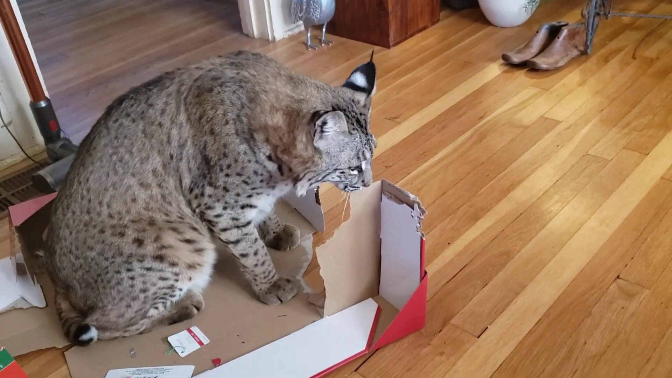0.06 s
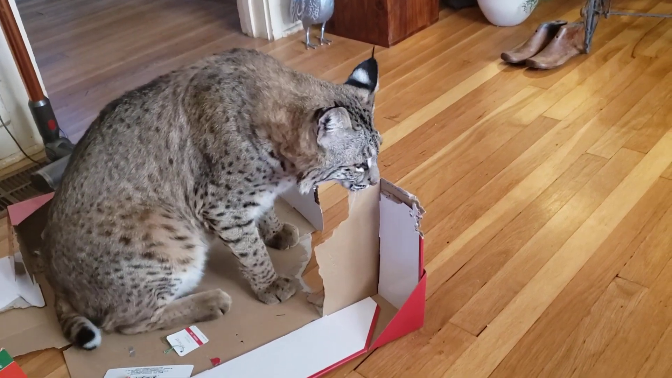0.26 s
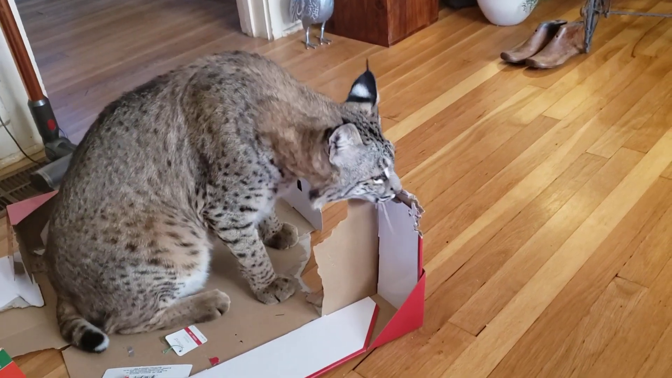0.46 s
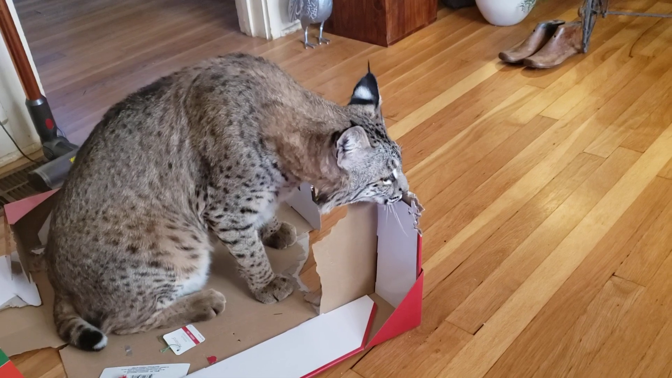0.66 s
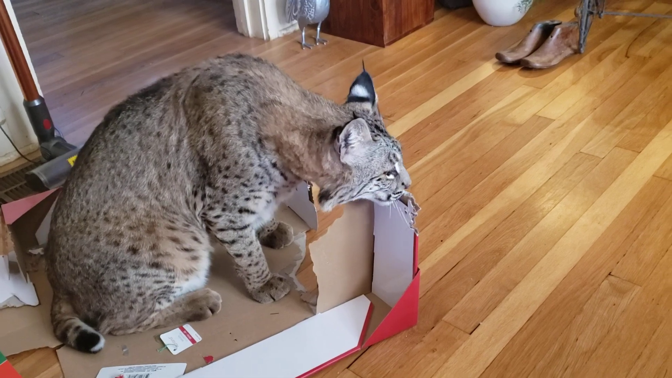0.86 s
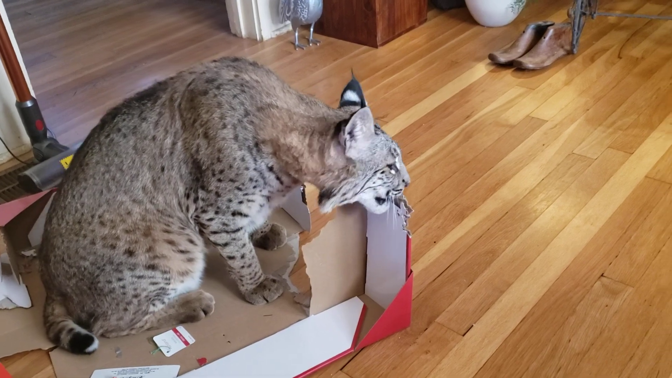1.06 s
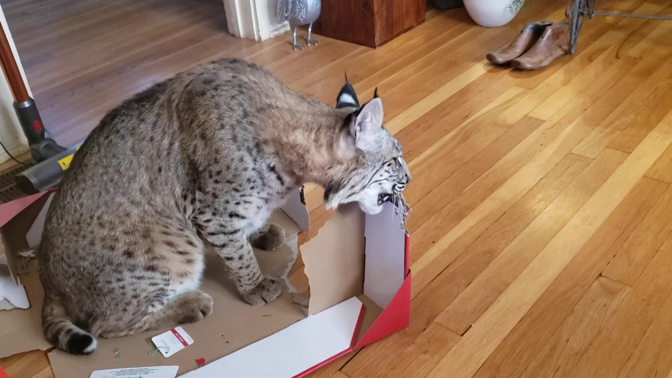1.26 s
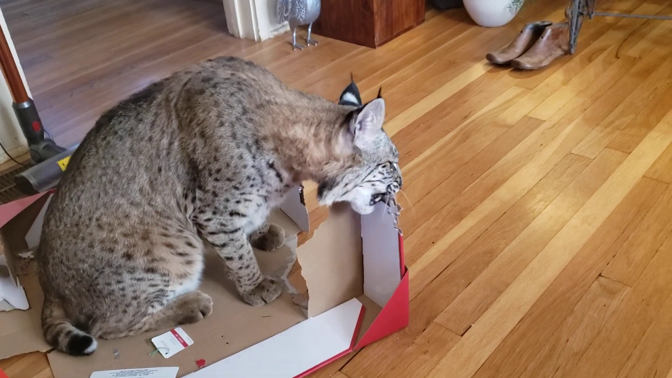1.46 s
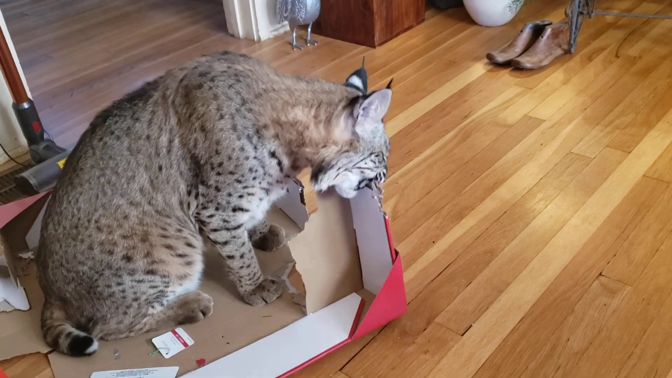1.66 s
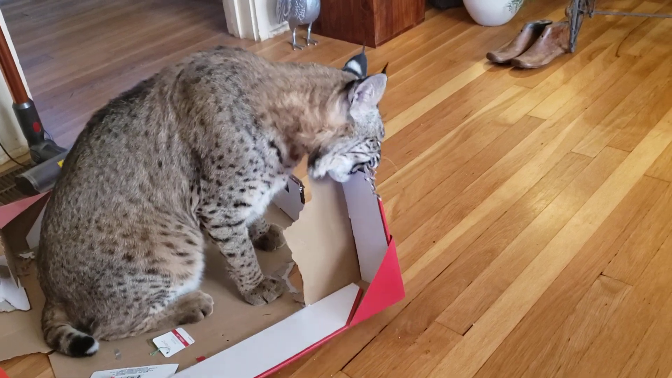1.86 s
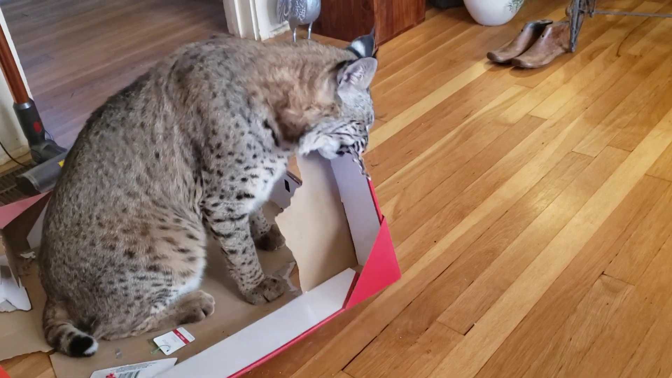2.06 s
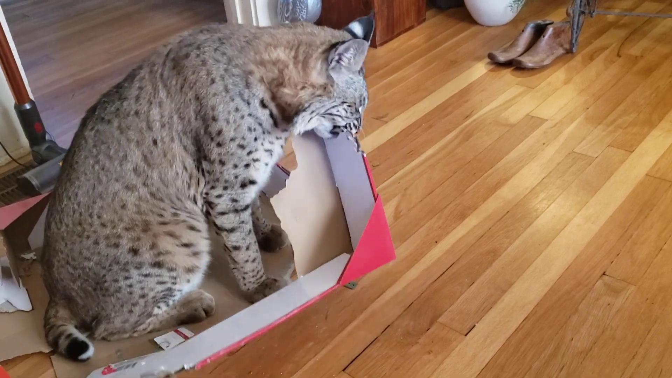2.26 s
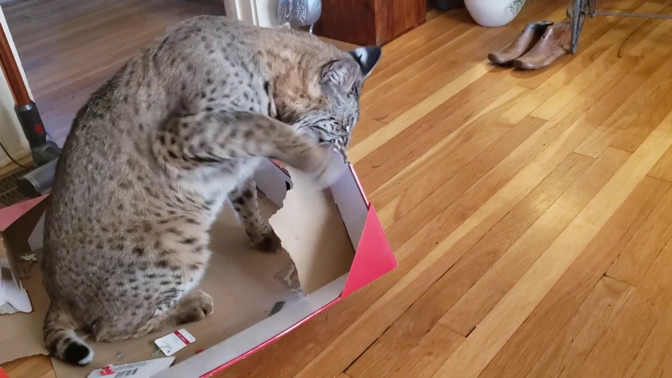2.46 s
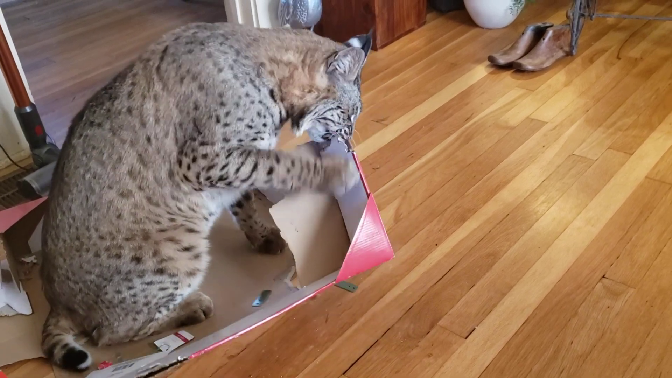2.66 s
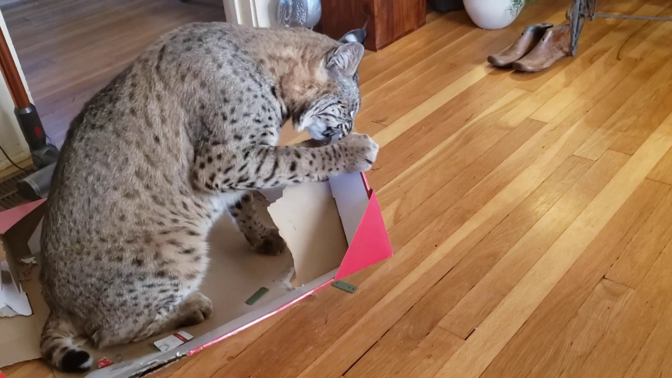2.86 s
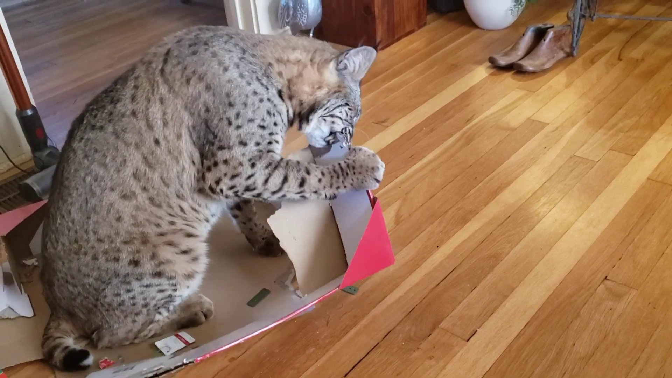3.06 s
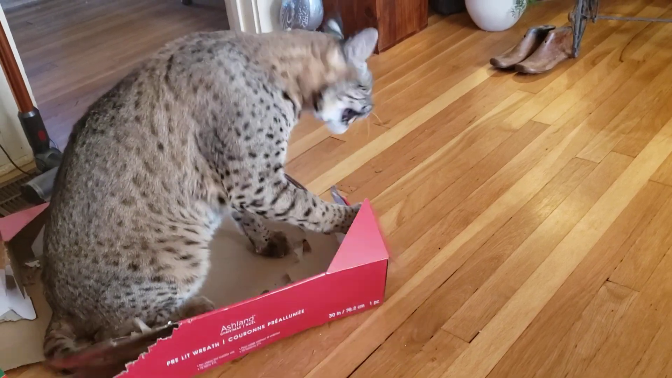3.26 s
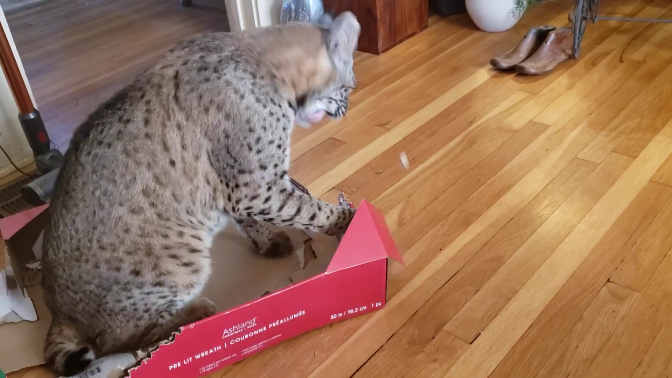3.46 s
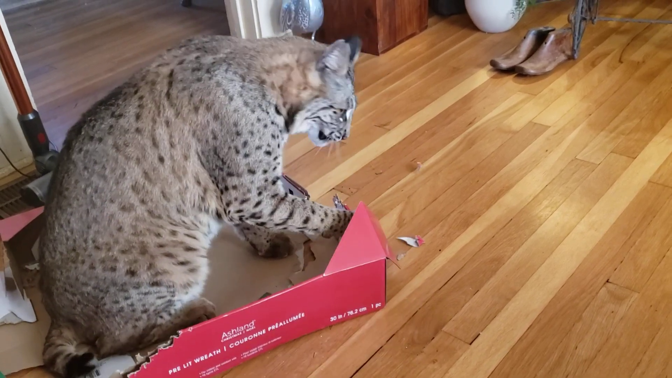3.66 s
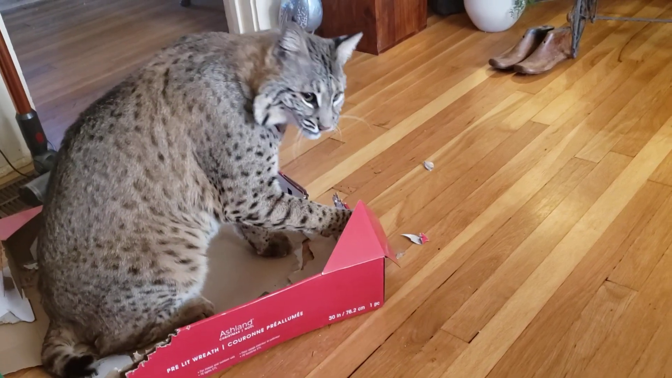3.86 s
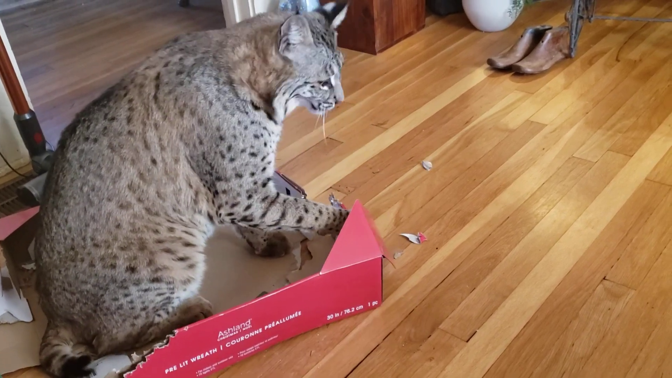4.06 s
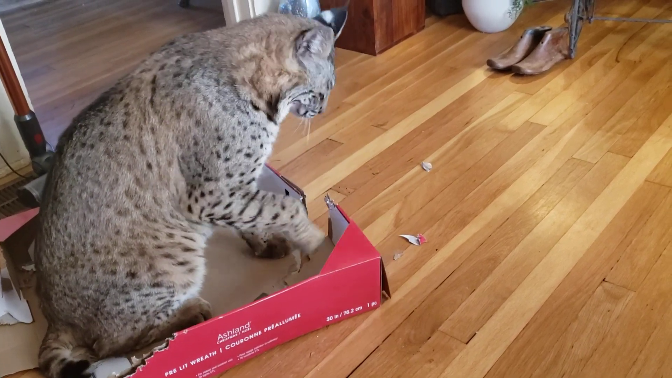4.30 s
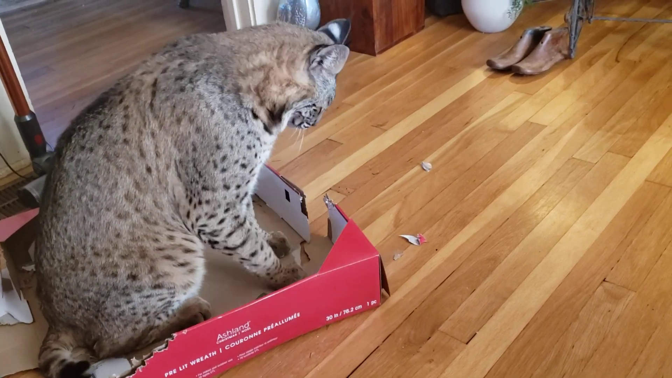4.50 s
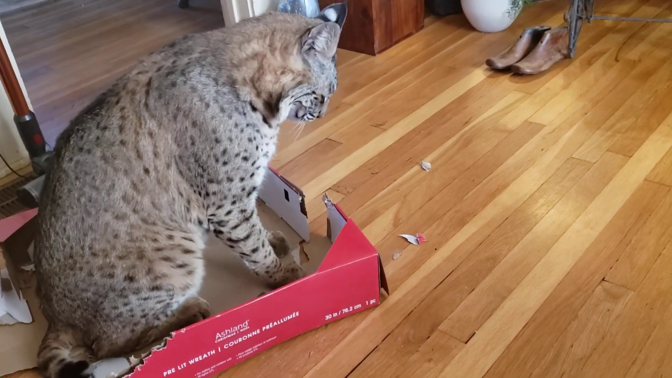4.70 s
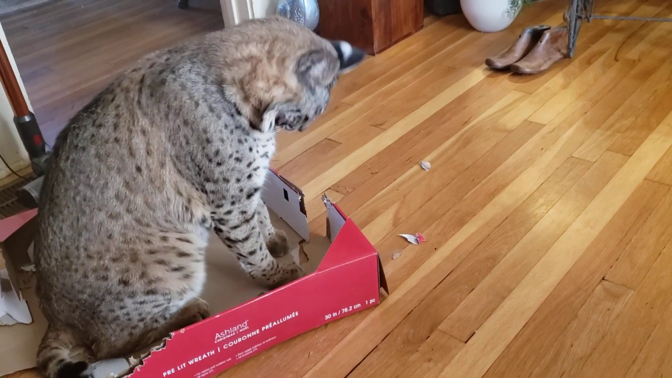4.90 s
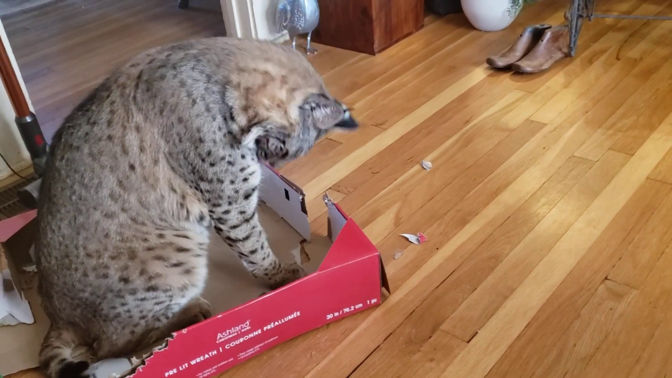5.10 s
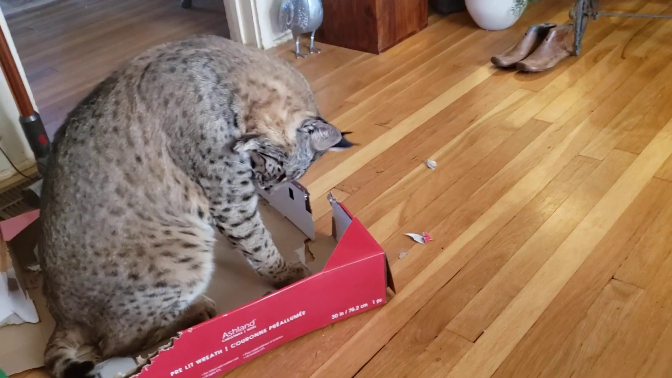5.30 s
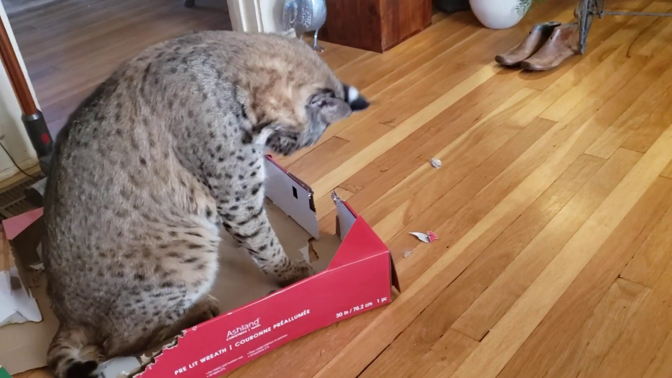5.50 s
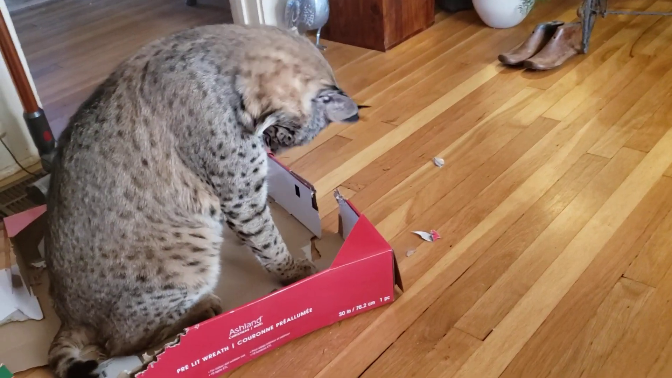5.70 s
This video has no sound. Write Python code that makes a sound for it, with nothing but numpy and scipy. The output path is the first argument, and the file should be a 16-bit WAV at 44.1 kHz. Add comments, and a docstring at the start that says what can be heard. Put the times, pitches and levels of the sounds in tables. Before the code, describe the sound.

Close stereo pickup of an animal chewing cardboard indoors. Light bite snaps and soft fur rustle grow into crunching and a creaking fold, peaking as a piece rips off and the flap slaps down with low wooden thuds. A short snort-like breath follows, then sparse muted knocks and paw scuffs with a short room reverberation.

```python
"""A low rumble and a thin hiss fill a quiet, lively room: steady noise of fixed colour and slowly varying level.
A big cat in a cardboard box on a wooden floor stirs and huffs: friction noise, and breath noise in resonances.
It bites the rim, and fibres snap as short noise bursts; a fold creaks by stick-slip, each slip ringing damped modes.
A piece tears off in dense crackle, the flap slaps back, and knocks excite the low notes of box and floorboards.
Strokes of fur and paws go on rubbing to the end, and decaying noise tails give the reverberation."""
import sys
import numpy as np
from scipy import signal
from scipy.fft import rfft, irfft, next_fast_len
from scipy.io import wavfile
from scipy.ndimage import uniform_filter1d, map_coordinates

SR = 44100
rng = np.random.default_rng(int(sys.argv[2]) if len(sys.argv) > 2 else 0)


def store_wav(level_fs):
    """Save 16-bit WAV to argv[1]."""
    pcm = np.round(np.clip(np.atleast_2d(level_fs), -1, 1) * 32767)
    wavfile.write(sys.argv[1], SR, pcm.T.astype(np.int16))


N = 253152

# Spectra of the room's rumble and hiss. Each row: frequency in Hz, density in dB per Hz.
RUMBLE_SPECTRUM = [(12, -53), (20, -22.5), (40, -4.5), (65, -2.5), (111, -6.5), (150, -16.5), (278, -36),
                   (304, -34), (323, -32), (400, -39), (520, -63), (880, -120)]
HISS_SPECTRUM = [(120, -35.5), (200, -6.5), (236, -2.5), (375, -18), (419, -12), (503, -24.5),
                 (1110, -24.5), (2130, -13), (3020, -21.5), (3840, -11), (5550, -15.5), (6930, -20),
                 (10600, -26.5), (15000, -16), (16500, -27)]
# Likeness of the two microphone signals. Each row: frequency in Hz, left-right coherence from 0 to 1.
COHERENCE = [(60, 0.94), (180, 0.72), (550, 0.34), (1650, 0.45), (4970, 0.15), (15000, 0.051)]
# Balance of the diffuse sound. Each row: frequency in Hz, left minus right in dB.
DIFFUSE_BALANCE = [(60, -2), (240, -2), (950, -0.5), (3770, -6), (15000, 1.5)]
# Reverberation of the room. Each row: frequency in Hz, 60 dB decay time in s.
ROOM_DECAY = [(100, 0.73), (500, 0.32), (1400, 0.31), (4000, 0.29), (10000, 0.23)]
# Panel modes of the box. Each row: frequency in Hz, width in Hz, lift in dB.
PANEL_MODES = [(227.4, 25, 9), (291.6, 34, 9.5), (560, 120, 3), (663, 150, 4.5), (849, 32, 5.5),
               (972, 60, 2), (1285, 240, 1), (1570, 140, 1.5), (1970, 160, 1.5), (2510, 87, 3),
               (2898, 470, -1.5), (3600, 81, 1.5), (5020, 400, 1), (7560, 410, 5)]
# Spectra of rubbing, from low drag to fine hiss. Each row: frequency in Hz, density in dB per Hz.
DRAG_SPECTRUM = [(120, -14.5), (200, -8), (311, -6.5), (440, 0), (600, -8), (800, -20.5), (1200, -42)]
RASP_SPECTRUM = [(350, -42), (600, -3), (1400, -4), (2700, -7), (4500, -33)]
FIBRE_SPECTRUM = [(1700, -41), (2800, 1.5), (5000, 0), (8300, -3.5), (11000, -33.5)]
FINE_SPECTRUM = [(6000, -41), (8800, 2), (12000, 7), (15500, 2), (16500, -19)]
# The box shifting under paws. Each row: time in s, level in dB.
DRAG_LEVELS = [(0.0, -88.5), (1.01, -89.5), (1.47, -75), (1.65, -86), (2.4, -76.5), (2.54, -53.5),
               (3.21, -70.5), (3.37, -46.5), (3.71, -63.5), (4.06, -68), (4.49, -66.5), (4.94, -91),
               (5.5, -88.5), (5.74, -69.5)]
# Fur and teeth working the fibres. Each row: time in s, level in dB.
RUSTLE_LEVELS = [(0.0, -80), (0.4, -76), (0.7, -80), (1.28, -77.5), (1.39, -79), (1.9, -71), (2.14, -64),
                 (2.38, -66), (2.64, -63), (2.88, -60.5), (3.15, -68.5), (3.32, -53), (3.5, -50),
                 (3.68, -73.5), (4.03, -89), (4.33, -64.5), (4.7, -86), (5.74, -95)]
# Single strokes of fur, muzzle or paw. Each row: start in s, length in s, rustle in dB, drag in dB.
STROKE_EVENTS = [(0.176, 0.33, -60.5, -90), (0.88, .14, -80, -85), (1.25, .17, -71.5, -78),
                 (1.5, .17, -69, -69), (1.806, .13, -70, -85), (1.997, .12, -59.5, -77.5),
                 (2.616, .25, -59.5, -59.5), (2.9, .19, -65, -55), (3.727, .38, -103, -70.5),
                 (4.092, .16, -69.5, -65), (4.65, 0.16, -85, -62), (4.903, .15, -71.5, -76.5),
                 (5.174, .1, -74.5, -75), (5.5, .24, -95.5, -75)]
# Huffs and sniffs of the cat. Each row: start in s, length in s, level in dB, low band in Hz,
# low band in dB, middle band in dB.
HUFF_EVENTS = [(0.88, 0.16, -75, 1500, -24, -17), (1.067, 0.097, -80, 1500, -17, -14),
               (3.579, 0.14, -42.5, 1690, 6.5, -0.5), (3.72, 0.66, -70.5, 980, 4.5, -26.5),
               (4.09, 0.18, -66, 2377, 4, -8), (4.685, 0.13, -70.5, 870, -4.5, -20),
               (4.902, 0.16, -62.5, 845, 9.5, 4), (5.609, 0.13, -71.5, 1660, 25.5, 6)]
# Low notes of the box and floorboards. Each row: frequency in Hz, level in dB, 60 dB decay time in s.
LOW_NOTES = [(59.4, -6.5, .18), (83, 0, .09), (130, -4, 0.092), (165, -2.5, .09), (198, -2, .08),
             (228.5, 1.5, 0.12), (294, -6.5, .06), (708, -3, 0.081), (861, -6.5, .1), (1090, -2, 0.023),
             (1370, -2.5, 0.021), (1593, 6.5, .027)]
# Knocks of paw, teeth and box. Each row: time in s, level in dB, pitch of the struck spot in Hz,
# reach in octaves, ring time as a multiple of the note's own.
THUMP_EVENTS = [(.318, -51.5, 210, 0.26, .6), (1.336, -41, 1310, 0.036, 0.33),
                (1.561, -49, 160, 0.363, 1.5), (1.6, -43, 1280, 0.08, 2.5),
                (2.467, -35.5, 231.4, 0.099, 2.1), (3.2204, -15.5, 450, 2.2, 1.17),
                (3.26, -17.5, 86.5, 0.86, 1.3), (3.47, -34.5, 199.4, 0.081, 1.08),
                (3.684, -34.5, 191, 0.058, 1.03), (4.269, -50, 224.7, .12, 2.7),
                (4.322, -22, 960, .15, 0.95), (4.524, -38.5, 198, 0.14, 0.26),
                (4.553, -34.5, 230, 0.089, 0.2), (4.597, -45, 200, .12, .4), (4.638, -52, 155, 0.12, 0.46),
                (5.198, -29, 59.4, .15, 1.37), (5.497, -47, 71.8, .25, 1.4)]
# Short modes of the creaking fold. Each row: frequency in Hz, level in dB, 60 dB decay time in s.
FOLD_MODES = [(1610, 6, .012), (1860, -0.5, .012), (2680, -5, 0.0035), (3100, -1, 0.014),
              (4314, -6, 0.0095), (7000, -36, 0.0054)]
# Placed slips of the fold. Each row: time in s, level in dB.
PLACED_SLIPS = [(2.5433, -42), (2.5668, -33.5), (2.6162, -36.5), (2.6291, -33), (2.6466, -22.5),
                (2.6596, -33), (2.687, -31), (2.702, -25), (2.7209, -32.5), (2.7454, -40), (2.7773, -34),
                (2.8132, -30.5)]
# Stretches of board ripping open. Each row: start in s, length in s, level in dB, crispness in dB.
RIP_EVENTS = [(1.187, 0.035, -51.5, -1.5), (1.468, 0.14, -55.5, -5.5), (1.945, 0.031, -51, 0),
              (2.119, 0.038, -56.5, -2.5), (2.309, 0.34, -59.5, -11), (2.726, 0.051, -58.5, -4),
              (2.863, 0.026, -50, -2), (2.91, 0.14, -62.5, 2.5), (3.192, 0.068, -32, -6.5),
              (3.278, 0.034, -41, -10.5), (3.328, .03, -40, -10), (4.267, 0.056, -51.5, -13.5),
              (4.313, 0.028, -53.5, -15.5), (5.175, 0.045, -73, -6)]
# Fibre snaps, bites and slaps. Each row: time in s, level in dB, weight of the box in dB,
# crispness in dB, ring frequency in Hz.
SNAP_EVENTS = [(0.3185, -51.5, -24, -14, 4000), (0.4187, -50.5, -38, -21, 2760),
               (0.9527, -54, -16.5, -24, 2900), (1.1896, -43, -28, 3, 1480), (1.2118, -39.5, -16, -8, 1820),
               (1.339, -50, -13, -14.5, 1320), (1.4702, -45, -52, -10, 1260),
               (1.508, -47.5, -35, -14, 1400), (1.5552, -38.5, -29, -13, 1390), (1.747, -65, -37, -5, 3880),
               (1.877, -53.5, -39, -54, 1520), (1.953, -35, -56, -7.5, 1230), (2.134, -46.5, -51, -6, 1720),
               (2.1441, -49, -22, -2, 3040), (2.2374, -88.5, -24, 20, 5430),
               (2.351, -47.5, -25, -16.5, 695), (2.3764, -52, -0.5, -1.5, 1400),
               (2.4162, -45, -11.5, -18, 910), (2.45, -30.5, -8.5, -22.5, 1660),
               (2.4678, -19, -16.5, -19.5, 1660), (2.5103, -27.5, -21, -24, 1530),
               (2.8635, -49, -20, -15.5, 1853), (2.8876, -48.5, -17.5, -4, 829),
               (2.9302, -49.5, -18.5, -12, 777), (3.0081, -52, -11.5, -10.5, 873),
               (3.0587, -57, -27, 8.5, 813), (3.0749, -32.5, -29.5, 8, 1500), (3.12, -52.5, -20, 1, 4820),
               (3.167, -62.5, -0.5, 13.5, 1664), (3.1947, -26, -22, -5, 3890),
               (3.2036, -18, -11.5, -14.5, 1560), (3.2202, -13.5, -6.5, -23, 741),
               (3.232, -20.5, 3, -16, 705), (3.2476, -36, -6, -10, 703), (3.2708, -25.5, -6.5, -7.5, 729),
               (3.2892, -25.5, -13.5, -17.5, 3220), (3.2994, -27, -21.5, -26, 1780),
               (3.3513, -33, -11, -14, 2650), (3.4478, -45.5, -15.5, -9.5, 1510),
               (3.466, -26, -3, -6.5, 2017), (4.2664, -34.5, -4.5, -24, 1415),
               (4.2788, -41, -6, -18.5, 1490), (4.3253, -31, -7.5, -27, 895), (4.4399, -37, -27, -19, 2350),
               (4.9409, -55, -4, -6.5, 810), (4.971, -65, 2.5, -3, 818), (5.007, -63, -26, -4, 4480),
               (5.1905, -61.5, 8.5, 1.5, 3850)]

RUMBLE_LEVEL_DB, RUMBLE_SWING_DB, RUMBLE_FROM_DRAG, HISS_DB = -63, 4.5, 0.18, -80
RASP_FROM_DRAG, RASP_DB, FINE_DB = 0.45, 0, -8.5  # first: share of the drag level in the rasp level
STROKE_SKEW, STROKE_POWER = 0.75, 1.1  # a skew under 1 peaks early; a higher power narrows the swell
NOSE_MID_HZ, NOSE_HIGH_HZ = 3870, 6200
CREAK_S, CREAK_LENGTH_S, RANDOM_SLIPS = 2.54, 0.33, 50
CREAK_DB, CREAK_SWELL_DB, SLIP_SCATTER_DB = -49.5, 19.5, 4.5
RIP_PANEL_DB, RIP_PANEL_PER_CRISP = -4, -1.1  # dull rips drum the panels more
SHARPNESS, SHARP_SCATTER, SHARP_PER_CRISP_DB = 0.43, 0.05, 0.08  # how much of a break is one spike
FRAY_T60_S, FRAY_PER_DB = 0.038, 0.0413  # decay time at a level of -40 dB; louder breaks fray longer
# Panels answer more to low-ringing, heavy breaks.
PANEL_DB, PANEL_PER_OCTAVE_DB, PANEL_PER_WEIGHT = 7, -4.5, 0.065
SNAP_PAN_DB, PAN_SCATTER_DB = -1.5, 0.6  # left minus right
TOP_HZ = 15900


def amp(db):
    """Convert level in decibels to an amplitude ratio."""
    return 10 ** (np.asarray(db) / 20)


def unit(x):
    """Normalize to a root-mean-square of 1."""
    return x / np.sqrt(np.mean(x ** 2) + 1e-20)


def along(points, hz):
    """Interpolate (Hz, value) points on a logarithmic frequency axis."""
    f, v = np.transpose(points)
    return np.interp(np.log(hz + 1), np.log(f + 1), v)


def level_curve(rows):
    """Interpolate (s, dB) rows linearly to one level per sample."""
    s, db = np.transpose(rows)
    return np.interp(np.arange(N) / SR, s, db)


def wobble(rate):
    """Random modulation: a smooth curve through rate random knots a second."""
    knots = rng.standard_normal(int(N * rate / SR) + 4)
    return map_coordinates(knots, [np.arange(N) * rate / SR])


def filtered(x, response):
    """Linear filtering: multiply the spectrum by a response of frequency."""
    m = next_fast_len(N + SR // 2)
    return irfft(rfft(x, m) * response(np.fft.rfftfreq(m, 1 / SR)), m)[..., :N]


def panels_db(hz):
    """Modal resonance: the panels lift or lower the level around their own frequencies."""
    return sum(db / (1 + (2 * (hz - c) / w) ** 2) for c, w, db in PANEL_MODES)


def minimum_phase(db):
    """Minimum phase: fold the cepstrum so that the energy of these gains comes earliest."""
    cepstrum = irfft(np.log(amp(db) + 1e-6))
    half = len(cepstrum) // 2
    cepstrum[1:half] *= 2
    cepstrum[half + 1:] = 0
    return irfft(np.exp(rfft(cepstrum)))


def stereo_noise(colour_db, alike, grain_db, rate):
    """Partial coherence: the mid-side ratio sets left-right likeness; random gain makes grains."""
    grains = amp(grain_db * wobble(rate)) * rng.standard_normal((2, N))

    def response(hz):
        angle = np.arccos(np.clip(along(alike, hz), 0, 1)) / 2
        return amp(colour_db(hz)) * np.array([np.cos(angle), np.sin(angle)])

    mid, side = filtered(grains, response)
    return unit(np.array([mid + side, mid - side]))


def motion():
    """Addition of powers: the lasting stir plus the swell of each stroke, as drag and rustle levels."""
    t = np.arange(N) / SR
    drag = amp(level_curve(DRAG_LEVELS)) ** 2
    rustle = amp(level_curve(RUSTLE_LEVELS)) ** 2
    for s, length, rustle_db, drag_db in STROKE_EVENTS:
        way = np.clip((t - s) / length, 0, 1)
        swell = np.abs(np.sin(np.pi * way ** STROKE_SKEW)) ** (2 * STROKE_POWER)
        drag = drag + amp(drag_db) ** 2 * swell
        rustle = rustle + amp(rustle_db) ** 2 * swell
    return 10 * np.log10(drag), 10 * np.log10(rustle)


def quiet_room():
    """Background noise: an unsteady rumble, stronger when the box shifts, under a thin smooth hiss."""
    drag_db = motion()[0]
    rumble_db = RUMBLE_LEVEL_DB + RUMBLE_SWING_DB * wobble(4.4)
    rumble_db = rumble_db + RUMBLE_FROM_DRAG * (drag_db - drag_db.mean())
    rumble = stereo_noise(lambda hz: along(RUMBLE_SPECTRUM, hz), [(60, 0.91)], grain_db=3.5, rate=9.7)
    hiss_alike = [(300, 0.8), (3000, 0.3), (12000, 0.2)]
    hiss = stereo_noise(lambda hz: along(HISS_SPECTRUM, hz), hiss_alike, grain_db=0.7, rate=6)
    return amp(rumble_db) * rumble + amp(HISS_DB) * hiss


def room(x):
    """Reverberation: convolve with decaying noise, drawn afresh for every quarter second."""
    out, step = np.zeros((2, N + 2 * SR)), SR // 4
    for start in range(0, N, step):
        hz, t, z = signal.stft(rng.standard_normal((2, SR // 2)), SR, nperseg=256)
        shared = np.clip(along(COHERENCE, hz), 0, 1)[:, None]
        z[1] = shared * z[0] + np.sqrt(1 - shared ** 2) * z[1]
        decay = amp(-60 * t / along(ROOM_DECAY, hz)[:, None])
        tail = signal.istft(z * decay, SR, nperseg=256)[1]
        tail = tail / np.linalg.norm(tail[0])
        wet = signal.fftconvolve(x[None, start:start + step], tail, axes=1)
        out[:, start + 130:][:, :wet.shape[1]] += wet  # the tail starts 3 ms late
    return out[:, :N]


def rubbing():
    """Friction: countless tiny slips; low ones drum the box, higher ones rasp and hiss in its fibres."""
    drag_db, fibre_db = motion()
    rasp_db = RASP_DB + RASP_FROM_DRAG * drag_db + (1 - RASP_FROM_DRAG) * fibre_db
    stroke = wobble(25)  # shared unevenness of all four layers

    def layer(level_db, spectrum, panels, grain_db, rate):
        colour = lambda hz: along(spectrum, hz) + panels * panels_db(hz)
        return amp(level_db) * stereo_noise(colour, COHERENCE, grain_db, rate)

    drag = layer(drag_db + 0.6 * stroke, DRAG_SPECTRUM, panels=1, grain_db=3.0, rate=53)
    rasp = layer(rasp_db + 0.81 * stroke, RASP_SPECTRUM, panels=1, grain_db=1, rate=84)
    fibre = layer(fibre_db + 1.3 * stroke, FIBRE_SPECTRUM, panels=1, grain_db=2.0, rate=700)
    fine = layer(fibre_db + FINE_DB + 1.4 * stroke, FINE_SPECTRUM, panels=0, grain_db=1.0, rate=300)
    return drag + rasp + fibre + fine


def huffs():
    """Turbulent flow: air through nose and teeth is noise in four resonant bands under a swell."""
    out, t = np.zeros((2, N)), np.arange(N) / SR
    for s, length, db, low_hz, low_db, mid_db in HUFF_EVENTS:
        # centre in Hz, level in dB, width relative to the centre
        bands = [(low_hz, low_db, 0.42), (NOSE_MID_HZ, mid_db, 0.18), (NOSE_HIGH_HZ, 0, 0.33), (13000, -10, 0.6)]

        def colour(hz):
            return 20 * np.log10(sum(amp(g) / (1 + (2 * (hz / c - 1) / w) ** 2) for c, g, w in bands))

        way = np.clip((t - s) / length, 0, 1)
        swell = np.sin(np.pi * way ** 0.5) ** 1.7  # peaks after a quarter of the length
        out += amp(db) * swell * stereo_noise(colour, COHERENCE, grain_db=2.0, rate=30)
    return out


def thumps():
    """Modal excitation: a soft contact rings the notes nearest its spot; a resting paw cuts them short."""
    out, t = np.zeros(N + SR), np.arange(SR // 2) / SR
    hz, level_db, t60 = np.transpose(LOW_NOTES)[..., None]
    for s, db, spot_hz, reach, ring in THUMP_EVENTS:
        near = np.exp(-0.5 * (np.log2(hz / spot_hz) / max(reach, 0.03)) ** 2)
        decay = amp(level_db - 60 * t / (t60 * max(ring, 0.1)))
        rise = 1 - np.exp(-t * hz / 0.16)  # lower notes build up more slowly
        notes = np.sin(2 * np.pi * hz * t) * decay * rise
        out[round(s * SR):][:len(t)] += amp(db) * (near * notes).sum(axis=0)
    return out[:N]


def creak():
    """Stick-slip: the fold slips at an uneven pace, and every slip rings its short, scattered modes."""
    out, t = np.zeros(N), np.arange(1024) / SR
    way = (np.arange(RANDOM_SLIPS) + rng.random(RANDOM_SLIPS)) / RANDOM_SLIPS
    slip_db = CREAK_DB + CREAK_SWELL_DB * np.sin(np.pi * way)  # hardest mid-way
    slip_db = slip_db + SLIP_SCATTER_DB * rng.standard_normal(RANDOM_SLIPS)
    random_slips = zip(CREAK_S + CREAK_LENGTH_S * way, slip_db)
    rise = 1 - np.exp(-t / 0.00066)
    for s, db in [*PLACED_SLIPS, *random_slips]:
        ring = np.zeros(len(t))
        for hz, level_db, t60 in FOLD_MODES:
            decay = amp(level_db + rng.normal(0, 2.5) - 60 * t / t60)
            ring += decay * np.sin(2 * np.pi * hz * rng.normal(1, 0.11) * t)
        out[round(s * SR):][:len(t)] += amp(db) * ring * rise / np.sqrt(len(FOLD_MODES))
    return out


def rips():
    """Progressive fracture: fibres part too fast to count, a dense crackle that starts at once and dies."""
    out, t = np.zeros((2, N)), np.arange(N) / SR
    for s, length, db, crisp_db in RIP_EVENTS:
        panel_db = RIP_PANEL_DB + RIP_PANEL_PER_CRISP * crisp_db
        points = [(200, panel_db - 27.0), (900, panel_db), (2700, 0.0018),
                  (9500, crisp_db), (16000, crisp_db - 9.0)]
        colour = lambda hz: along(points, hz) + 0.2 * panels_db(hz)
        onset = np.clip((t - s) / 0.0023, 0, 1)
        release = amp(-60 * np.clip(t - s - length, 0, None) / 0.044)
        out += amp(db) * onset * release * stereo_noise(colour, COHERENCE, grain_db=7.5, rate=480)
    return out


def snaps():
    """Impulsive fracture: a spike and a ragged dying burst, coloured by the panels they shake."""
    out, t = np.zeros((2, N + SR)), np.arange(8192) / SR
    hz = np.fft.rfftfreq(4096, 1 / SR)
    alike = along(COHERENCE, hz)
    side_db = 10 * np.log10(np.clip(1 - alike, 0.01, 1) / (1 + np.clip(alike, 0, 1)))
    for s, db, body_db, crisp_db, ring_hz in SNAP_EVENTS:
        noise, luck = rng.standard_normal((3, len(t))), rng.standard_normal(2)
        ragged = amp(5.0 * unit(uniform_filter1d(noise[2], size=40)))

        # the brightest breaks are mostly spike
        sharp = SHARPNESS + SHARP_SCATTER * luck[0] + SHARP_PER_CRISP_DB * max(crisp_db, 0)
        sharp = np.clip(sharp, 0, 0.9)
        rise = 1 - np.exp(-t / (0.00033 + 0.0048 * (1 - sharp) ** 3))  # blunt breaks build up more slowly
        spike = 4.6 * sharp ** 2 * amp(-60 * t / 0.0038)
        fray_t60 = FRAY_T60_S * amp(FRAY_PER_DB * (db + 40))
        fray = 2.02 * (1 - sharp) * ragged * amp(-60 * t / fray_t60)
        burst = noise[:2] * rise * (spike + fray)

        panel_db = PANEL_DB + PANEL_PER_OCTAVE_DB * np.log2(ring_hz / 1e3) + PANEL_PER_WEIGHT * body_db
        points = [(60, body_db + 2), (280, body_db + 13), (900, panel_db), (2700, 0.0042),
                  (9500, crisp_db + 2.5), (16000, crisp_db + 1)]
        ring_db = 7 / (1 + (2 * (hz / ring_hz - 1) / 0.3) ** 2)
        colour_db = along(points, hz) + panels_db(hz) + ring_db

        # a wide box reaches the two microphones by different paths
        mid = signal.fftconvolve(burst[0], minimum_phase(colour_db)[:2048])[:len(t)]
        side = signal.fftconvolve(burst[1], minimum_phase(colour_db + side_db)[:2048])[:len(t)]
        pan_db = SNAP_PAN_DB + PAN_SCATTER_DB * luck[1]
        gain = amp(db + pan_db * np.array([[0.5], [-0.5]]))
        out[:, round(s * SR):][:, :len(t)] += gain * np.array([mid + side, mid - side])
    return out[:, :N]


def scene():
    """Superposition: direct sounds add to their reverberation; all but the snaps share a diffuse balance."""
    breaks, blows, fold, tears, air = snaps(), thumps(), creak(), rips(), huffs()
    tail = room((breaks + tears + 0.21 * air).mean(axis=0) + 0.36 * blows + 0.6 * fold)
    spread = amp(-1.5) * tail + blows + fold + tears + rubbing() + air + quiet_room()
    halves = np.array([[0.5], [-0.5]])
    return breaks + filtered(spread, lambda hz: amp(along(DIFFUSE_BALANCE, hz) * halves))


def record(dry):
    """Band limiting: the microphones lose the deepest bass, and nothing passes above TOP_HZ."""
    return filtered(dry, lambda hz: (hz < TOP_HZ) * (1j * hz / (30 + 1j * hz)) ** 4)


dry = scene()
out = record(dry)
store_wav(out)
```